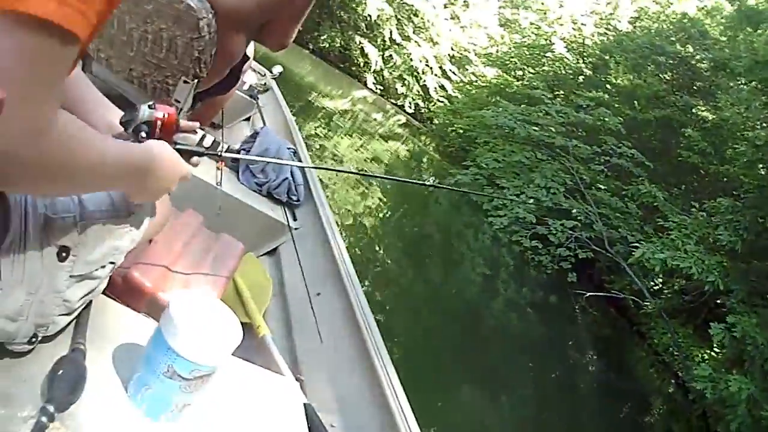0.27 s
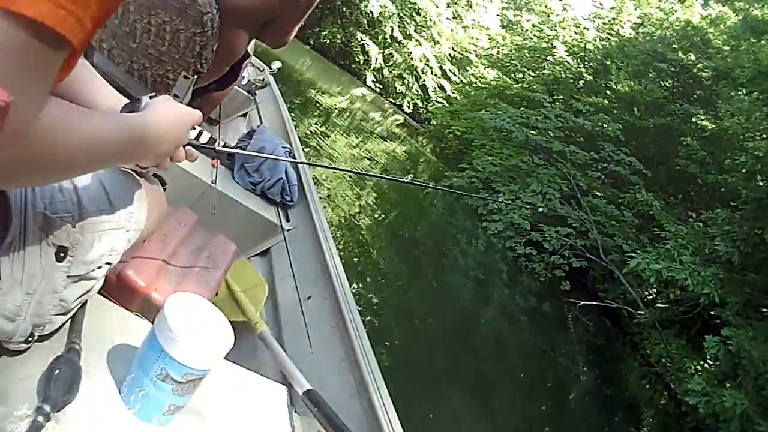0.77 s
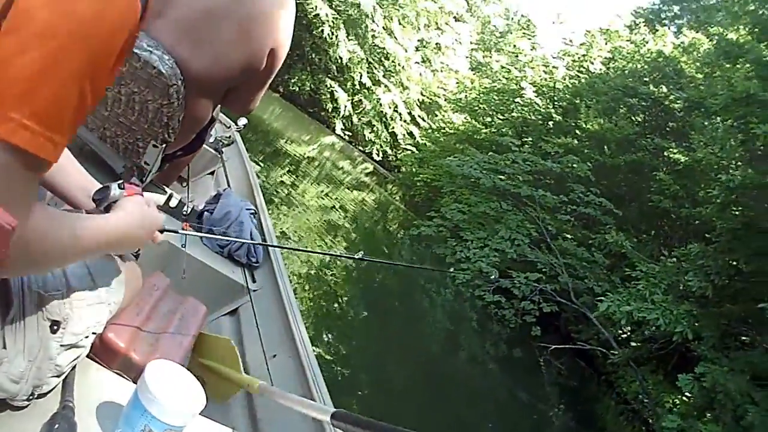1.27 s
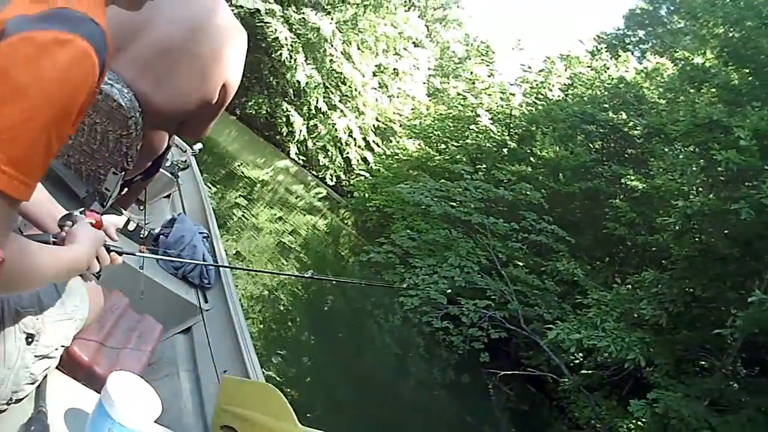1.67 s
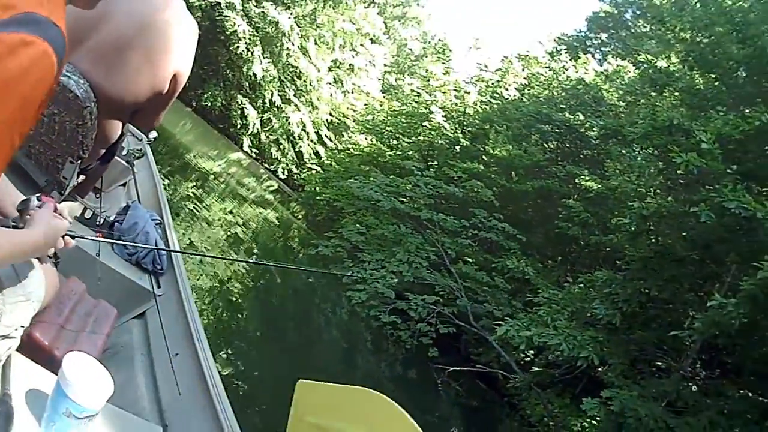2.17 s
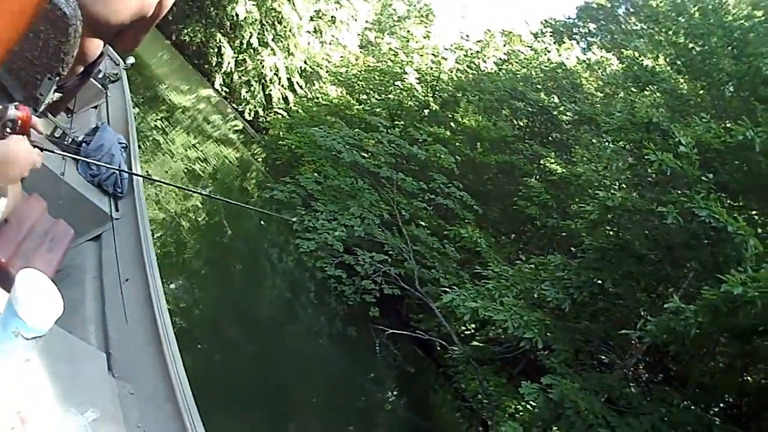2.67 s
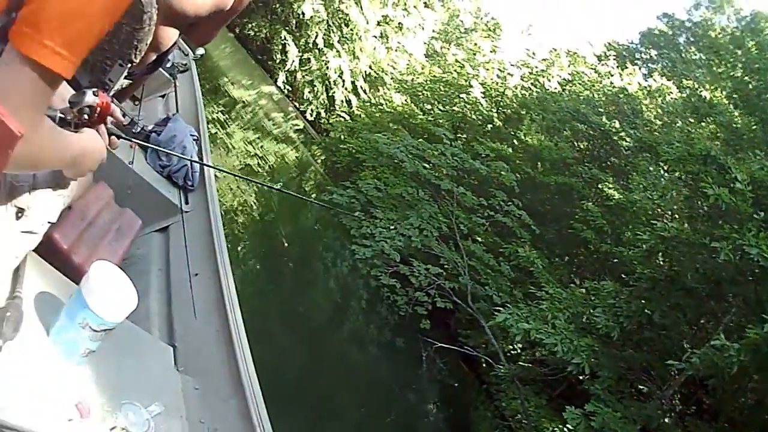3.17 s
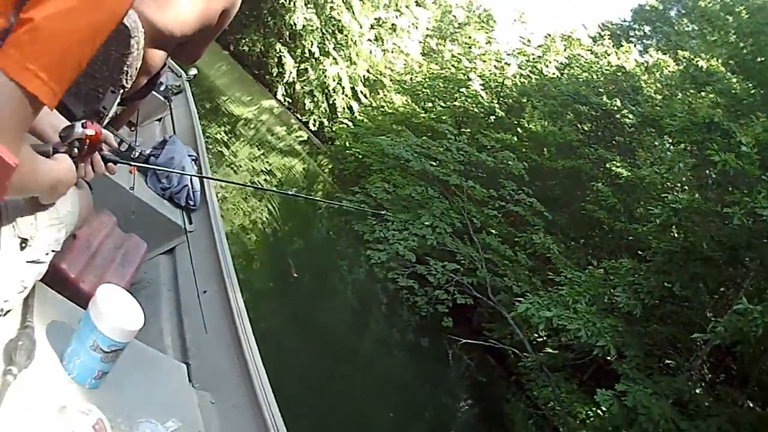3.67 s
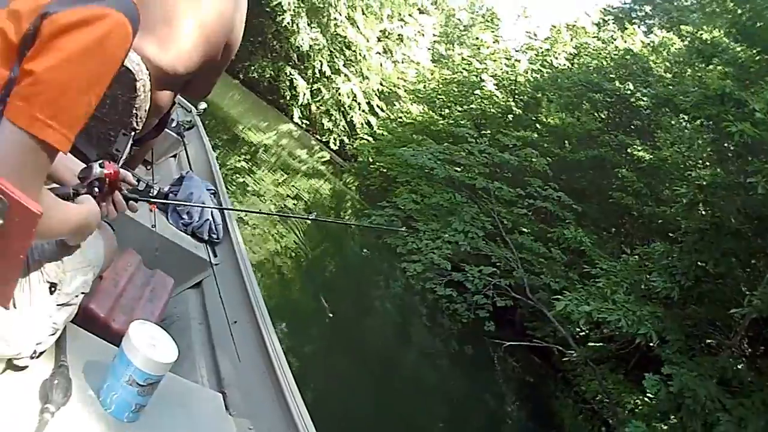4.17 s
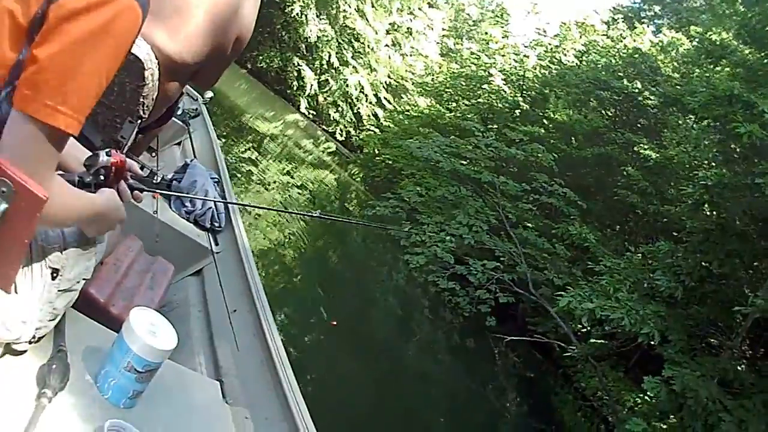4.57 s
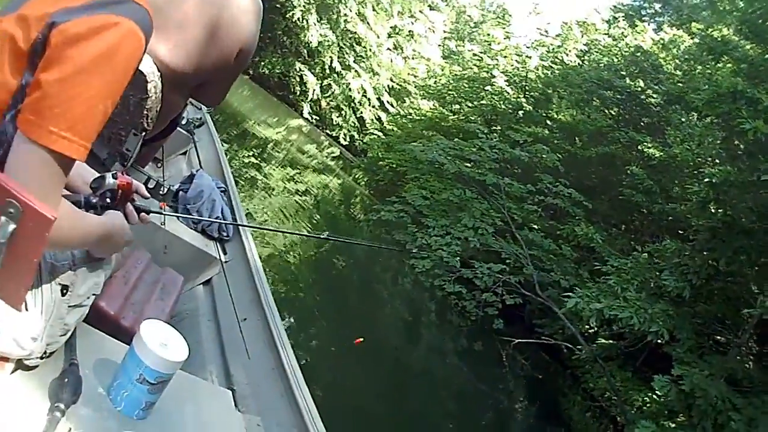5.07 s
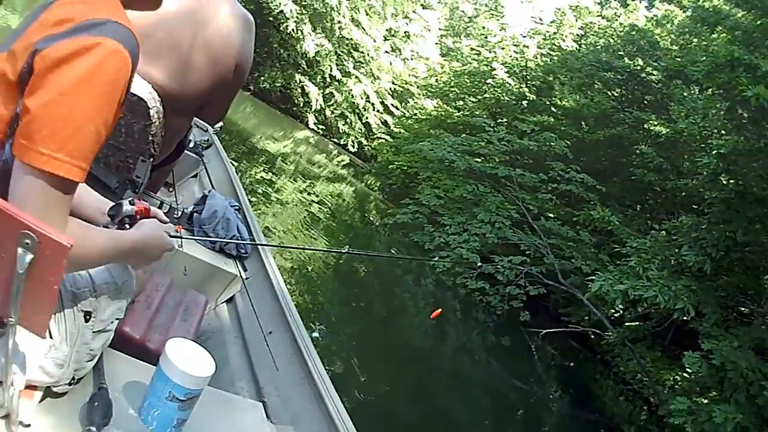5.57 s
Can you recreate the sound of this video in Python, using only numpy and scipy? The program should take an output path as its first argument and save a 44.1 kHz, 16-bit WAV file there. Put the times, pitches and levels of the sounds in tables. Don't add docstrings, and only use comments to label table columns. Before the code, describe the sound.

Hollow bangs and scrapes ring briefly through an aluminium boat, followed by light taps, tiny ticks, water spits and low wind buffeting.

```python
import sys
import numpy as np
from scipy import signal
from scipy.fft import rfft, irfft
from scipy.io import wavfile
from scipy.ndimage import map_coordinates

SR = 44100
rng = np.random.default_rng(int(sys.argv[2]) if len(sys.argv) > 2 else 0)


def ratio(d):
    e = np.asarray(d, float) / 20
    return 10 ** e


def materialize(psi):
    bounded = np.clip(np.atleast_2d(psi).T, -1, 1)
    quanta = np.round(bounded * 32767).astype(np.int16)
    wavfile.write(sys.argv[1], SR, quanta)


N = 257544


def rms_one(x):
    return x / np.sqrt(np.mean(x ** 2) + 1e-20)


def in_time(rows):
    start_s, *columns = np.transpose(rows)
    t = np.arange(N) / SR
    return [np.interp(t, start_s, column, left=-150, right=-150) for column in columns]


def band(x, low_hz, high_hz):
    return signal.sosfilt(signal.butter(2, [low_hz, high_hz], "band", fs=SR, output="sos"), x)


def noise_band(low_hz, high_hz):
    return rms_one(band(rng.standard_normal(N), low_hz, high_hz))


def drift(rate_hz):
    r = np.exp(-2 * np.pi * rate_hz / SR)
    wander = signal.lfilter([1], [1, -2 * r, r * r], rng.standard_normal(N + SR))
    return rms_one(wander[SR:])


def ring(clicks, pitch_hz, t60_s):
    r = ratio(-60 / (t60_s * SR))
    w = 2 * np.pi * pitch_hz / SR
    return signal.lfilter([0, np.sin(w)], [1, -2 * r * np.cos(w), r * r], clicks + 1e-18)


def resonances(x, peaks):
    out = 0
    for k, (pitch_hz, width_hz, level_db) in enumerate(peaks):
        r = np.exp(-np.pi * width_hz / SR)
        poles = [1, -2 * r * np.cos(2 * np.pi * pitch_hz / SR), r * r]
        out = out + (-1) ** k * ratio(level_db) * signal.lfilter([1 - r * r, 0, r * r - 1], poles, x)
    return out


def strikes(blows, pitch_hz, scatter_db):
    start_s, peak_db, spot_hz, treble_db = np.transpose(blows)
    spot_fall_db, treble_from_hz = 20, 1250
    if pitch_hz > treble_from_hz:
        colour_db = treble_db
    else:
        colour_db = -spot_fall_db * np.abs(np.log2(pitch_hz / spot_hz))
    clicks = np.zeros(N)
    clicks[np.round(start_s * SR).astype(int)] = ratio(peak_db + colour_db + scatter_db)
    return clicks


# start_s [s], peak_db [dB], spot_hz [Hz], treble_db [dB]
BENCH_BLOWS = [(.586, -41.5, 412, -7), (.603, -48, 149, -36), (.944, -41, 533, -27),
               (.951, -36.5, 380, -38), (.99, -38, 135, -40), (1.044, -41, 990, -40),
               (1.047, -32, 497, -28), (1.057, -40, 593, -31), (1.084, -38.5, 900, -30),
               (1.087, -30, 500, -30), (1.092, -33.5, 145, -40), (1.103, -45.5, 900, -22),
               (1.112, -35.5, 395, -21), (1.13, -36, 640, -12), (1.135, -35, 196, -25),
               (.955, -47, 249, -40), (1.053, -35.5, 275, -40), (1.098, -40, 275, -40),
               (1.12, -38, 290, -33), (1.15, -54, 516, -30), (3.149, -47, 473, -10), (3.215, -51, 300, -30),
               (3.24, -53, 340, -30), (3.265, -50, 277, -31), (3.3, -47.5, 260, -32),
               (3.61, -44.5, 438, -27)]
RAIL_BLOWS = [(1.554, -45, 715, -10), (1.571, -25, 830, -2.5), (1.5781, -35.5, 800, -9.5),
              (1.573, -25, 145, -40), (1.579, -37, 900, -7), (1.582, -25.5, 268, -42),
              (1.5916, -24.5, 318, -34), (1.613, -48, 240, -14), (1.652, -35.5, 900, -1),
              (1.669, -33.5, 254, -30), (1.686, -41, 840, -17), (3.145, -43.5, 790, -8),
              (3.606, -47, 900, -5.5)]
FLOOR_BLOWS = [(2.118, -59.5, 1014, 16), (2.1367, -28, 345, -6.5), (2.1375, -26, 570, -30),
               (2.139, -34, 125, -40), (2.209, -32.5, 820, -1.5), (2.213, -33, 505, -20),
               (2.21, -38.5, 125, -34), (2.214, -38.5, 245, -36), (2.245, -33, 245, -38),
               (2.262, -40.5, 80, -43), (2.344, -35.5, 514, 3.5), (2.356, -42.5, 487, -30),
               (2.347, -33, 167, -40), (2.387, -44, 403, 7), (2.39, -43.5, 130, -40),
               (2.406, -41, 970, -17), (2.443, -42, 125, -48)]
# pitch_hz [Hz], level_db [dB], t60_s [s]
BENCH_MODES = [(135, 2, 0.14), (196, -4, 0.24), (275, 2.5, 0.071), (384, 1.5, 0.09), (490.6, -1.5, 0.094),
               (594, 2.5, 0.05), (748, -3.5, 0.25), (926, 5.5, 0.081)]
RAIL_MODES = [(113.7, -2.5, 0.36), (145, -15, 0.66), (238.1, -4.5, 0.54), (275, -21, 0.17),
              (318, -0.5, 0.082), (653, 1.5, 0.051), (840, -7, 0.15), (1008, 0, 0.091), (1447, -12, 0.18),
              (2050, -3.5, 0.034), (2800, -7, 0.072)]
FLOOR_MODES = [(80, 1, 0.37), (125, 0, 0.48), (140.5, -4.5, 0.6), (174, 2, 0.13), (245, -4.5, 0.2),
               (346, -3.5, 0.17), (391, -9.5, 0.25), (505, -2.5, 0.15), (573.6, -11, 0.24),
               (767, -3.5, 0.164), (911, -4.5, 0.13), (1508, -3.5, 0.061), (1840, -6, 0.011)]
# pitch_hz [Hz], level_db [dB], t60_s [s]
SHIVER = [(900, -6, 0.056), (1630, -13.5, 0.045), (2440, -2, 0.035), (3630, -4, 0.028)]


def hull():
    out = np.zeros(N)
    swell = 0.21
    parts = ((BENCH_BLOWS, BENCH_MODES), (RAIL_BLOWS, RAIL_MODES), (FLOOR_BLOWS, FLOOR_MODES))
    for blows, modes in parts:
        scatter_db = 1.2 * rng.standard_normal((len(blows), len(modes)))
        for k, (pitch_hz, level_db, t60_s) in enumerate(modes):
            rise = np.exp(-pitch_hz / (swell * SR))
            swing = ring(strikes(blows, pitch_hz, scatter_db[:, k]), pitch_hz, t60_s)
            swelled = ring(swing, pitch_hz, np.log(1000) * swell / pitch_hz)
            out += (-1) ** k * ratio(level_db - 2.5) * 2 * (1 - rise) * swelled
    for pitch_hz, level_db, t60_s in SHIVER:
        clicks = strikes(BENCH_BLOWS + RAIL_BLOWS + FLOOR_BLOWS, pitch_hz, 0)
        fading = signal.lfilter([1], [1, -ratio(-60 / (t60_s * SR))], clicks + 1e-18)
        out += ratio(level_db) * fading * noise_band(pitch_hz / 1.59, pitch_hz * 1.9)
    return out


# start_s [s], peak_db [dB], pitch_hz [Hz], length_ms [ms]
CRACKS = [(1.0445, -36, 2000, 1.5), (1.048, -28, 540, 4), (1.0845, -36, 1900, 1.5), (1.0875, -27, 560, 3.5),
          (1.5535, -31, 2800, 1.5), (.9445, -41, 600, 5), (1.5708, -30, 2300, 1.5), (1.572, -28, 720, 3),
          (1.652, -34, 2000, 2), (2.118, -35, 3200, 1.5), (2.1358, -28, 2600, 1.3), (2.1398, -28, 560, 2.6),
          (2.3435, -31, 1950, 3), (2.2069, -21.5, 1900, 2.4), (2.2069, -27, 3200, 1.8),
          (2.2076, -27, 600, 2.2), (3.527, -59, 2060, 14)]


def cracks():
    out = np.zeros(N)
    for start_s, peak_db, pitch_hz, length_ms in CRACKS:
        t = np.arange(round(length_ms * SR / 1000)) / SR
        at = round(start_s * SR)
        out[at:at + len(t)] += ratio(peak_db) * np.hanning(len(t)) * np.sin(2 * np.pi * pitch_hz * t)
    return out


# start_s [s], length_s [s], hiss_db [dB], rumble_db [dB], swell_db over the stroke [dB]
STROKES = [
    (0, 0.054, -54, -67.5, 1.5),
    (1.02, .12, -51, -48.5, 5),
    (1.151, 0.066, -59.5, -54, -4.5),
    (1.228, 0.28, -58, -65, 4),
    (1.557, 0.012, -34.5, -43, 0),
    (1.58, 0.14, -49, -48.5, -1),
    (2.128, 0.061, -45.5, -51.5, 1),
    (2.204, 0.042, -45, -44, -6.5),
    (2.35, 0.047, -46.5, -54, 10.5),
    (3.214, 0.074, -68, -58.5, -4),
]


def scrape():
    touch_db_per_s, lift_db_per_s = 2494, 1303
    hit = rng.random(N) < 5000 / SR
    grit = hit * ratio(2.94 * rng.exponential(1, N)) * rng.choice([-1, 1], N)
    hiss = rms_one(band(grit, 1700, 5900) + ratio(1) * resonances(grit, [(2050, 150, 0.0099)]))
    plating = [(300, 99, -1.7), (533, 146, -1.5), (830, 730, -3.5)]
    rumble = rms_one(resonances(band(grit, 200, 1210), plating))
    out, t = np.zeros(N), np.arange(N) / SR
    for start_s, length_s, hiss_db, rumble_db, swell_db in STROKES:
        since = t - start_s
        edge_db = touch_db_per_s * np.minimum(since, 0) - lift_db_per_s * np.maximum(since - length_s, 0)
        lean_db = swell_db * np.clip(since / length_s - .5, -.5, .5)
        press = ratio(np.maximum(edge_db, -150) + lean_db)
        out += press * (ratio(hiss_db) * hiss + ratio(rumble_db) * rumble)
    return out


# start_s [s], slips_per_s [1/s], level_db [dB]
CREAK = [
    (0, 29, -74),
    (.18, 29.6, -56.5),
    (.25, 29.6, -56.5),
    (.35, 39, -55.5),
    (.5, 47, -52),
    (.62, 35, -55),
    (.66, 40, -87),
]
# pitch_hz [Hz], width_hz [Hz], level_db [dB]
CREAK_BODY = [(156.8, 20.5, 14.5), (441, 66, 1.5), (345, 190, -9), (254, 20, -11)]


def creak():
    slips_per_s, level_db = in_time(CREAK)
    pace = np.clip(slips_per_s, 10, 90) * (1 + 0.0576 * drift(15))
    count = np.floor(np.cumsum(pace) / SR)
    slips = np.diff(count, prepend=0) * ratio(0.47 * drift(25))
    slips = slips + 0.013 * rng.standard_normal(N)
    knocks = band(band(slips, 134, 550), 65, 790)
    return ratio(level_db) * rms_one(resonances(knocks, CREAK_BODY))


# start_s [s], peak_db [dB], pitch_hz [Hz]
TICKS = [(0.1745, -63, 1980), (0.7118, -68, 1790), (0.7558, -69, 2010), (0.7966, -65, 1930),
         (1.309, -67, 2030), (1.479, -55, 1880), (1.7616, -69, 2060), (1.8432, -65, 1800),
         (1.982, -60, 1850), (2.0732, -72, 2050), (2.505, -66.5, 1710), (2.7127, -65, 1620),
         (2.9768, -67, 1700), (2.999, -70, 2070), (3.0414, -75, 1750), (3.252, -69, 2020),
         (3.415, -72, 2400), (3.66, -79, 1960), (4.141, -71, 1690), (4.315, -83, 1700), (5.2063, -73, 1960),
         (5.319, -70, 2050)]


def ticks():
    length = 600
    out, t = np.zeros(N + length), np.arange(length) / SR
    snaps = rng.standard_normal((len(TICKS), length))
    for (start_s, peak_db, pitch_hz), snap in zip(TICKS, snaps):
        at = round(start_s * SR)
        ping = np.sin(2 * np.pi * pitch_hz * t)
        out[at:at + length] += ratio(peak_db + 9.5) * (ping + 1.9 * snap) * np.exp(-t / 0.0037)
    return band(out[:N], 1200, 5000)


# start_s [s], peak_db [dB]
DROPS = [(0.047, -62), (0.286, -58), (0.674, -60), (0.712, -55), (0.752, -56), (0.924, -59), (1.27, -55),
         (1.317, -63), (1.764, -68), (1.984, -59), (2.645, -58), (2.774, -54.5), (2.838, -54.5),
         (2.953, -60), (3.19, -55), (3.219, -54), (3.414, -62), (3.457, -64), (3.48, -56), (3.621, -59),
         (3.658, -55), (4.068, -59), (4.142, -62), (4.471, -59), (4.956, -59), (5.108, -61), (5.489, -61),
         (5.803, -65)]


def crackle():
    drip_db, drips_per_s = -73, 32
    born = (rng.random(N) < drips_per_s / SR) * ratio(drip_db + 5.1 * np.minimum(rng.exponential(1, N), 3))
    born[[round(max(start_s, 0) * SR) for start_s, peak_db in DROPS]] = ratio(np.array(DROPS)[:, 1] + 2)
    spit = signal.lfilter([1], [1, -np.exp(-1 / (0.004 * SR))], born + 1e-18)
    return spit * noise_band(2600, 6000)


# middle_s [s], length_s [s], top_db [dB]
GUSTS = [(0.013, 0.15, -44), (.17, 0.11, -50), (0.396, 0.58, -48.5), (0.671, .14, -48.5),
         (0.846, 0.35, -55.5), (1.76, .14, -52.5), (2.283, 0.25, -53), (2.992, 0.32, -53.5),
         (3.163, 0.11, -48), (3.323, 0.19, -58), (3.533, 0.1, -50), (3.883, 0.78, -55.5),
         (4.4, 0.51, -48.5), (4.775, 0.74, -52), (5.153, 0.37, -54), (5.365, 0.38, -45.5),
         (5.523, 0.2, -46), (5.82, 0.36, -58.5)]


def breeze():
    t = np.arange(N) / SR
    strength = ratio(-57)
    for middle_s, length_s, top_db in GUSTS:
        strength = strength + ratio(top_db) * np.cos(np.pi * np.clip((t - middle_s) / length_s, -.5, .5)) ** 2
    return rms_one(band(band(rng.standard_normal(N), 9.4, 35.4), 9.4, 140)) * strength


# start_s [s], level_db [dB]
STIR = [(0, 3), (.4, 3), (.7, 1), (1.06, 2), (1.5, 1.5), (2.2, 1.5), (2.7, 0), (3.5, -1), (4.5, -1.5),
        (5.0, -2.5), (5.5, -2), (5.84, -3)]
# pitch_hz [Hz], level_db per Hz [dB]
AIR = [(100, -24.5), (300, -12), (600, -14.5), (850, -12), (1300, -15), (1400, -19.5), (1600, -16),
       (1800, -21.5), (2050, -18.5), (2300, -23.5), (2900, -22), (3200, -21.5), (3700, -17), (4600, -29.5)]
# pitch_hz [Hz], width_hz [Hz], level_db [dB]
PORT = [(1077.3, 31, 9), (975, 217, 1.5), (1120, 96, 4.5)]


def ambience():
    stir_db, = in_time(STIR)
    hum = noise_band(43, 176.0) * ratio(-60 + 2.05 * stir_db)
    pitch_hz = np.fft.rfftfreq(N, 1 / SR) + 1
    air_hz, air_db = np.transpose(AIR)
    shape_db = np.interp(np.log(pitch_hz), np.log(air_hz), air_db, left=-40)
    wash = rms_one(irfft(rfft(rng.standard_normal(N)) * ratio(shape_db), N))
    wash = wash * ratio(-61.5 + 1.2 * stir_db + 1.4 * drift(11))
    tone = rms_one(resonances(band(rng.standard_normal(N), 700, 1150), PORT))
    return hum + wash + tone * ratio(-56.5 + 0.87 * stir_db)


def scene():
    paddle = hull() + cracks() + scrape() + creak()
    lake = ticks() + crackle() + breeze() + ambience()
    return np.tile(paddle + lake, (2, 1))


def top_cut(x):
    return signal.sosfilt(signal.butter(12, 15150, fs=SR, output="sos"), x)


def record(dry):
    slow_rate_hz, rounding_db = 8000, -90
    step = SR / slow_rate_hz
    guarded = signal.sosfilt(signal.cheby2(8, 50, 5000, fs=SR, output="sos"), dry[0])
    grid = np.arange(0, N, step)
    slow = map_coordinates(guarded, [grid], order=3, mode="nearest")
    lines = np.array([np.interp(np.arange(N) - lag, grid, slow) for lag in (step, 0)])
    hiss = rms_one(band(rng.standard_normal((2, N)), 3200, 4500))
    return top_cut(lines + ratio(rounding_db) * hiss)


dry = scene()
out = record(dry)
materialize(out)
```